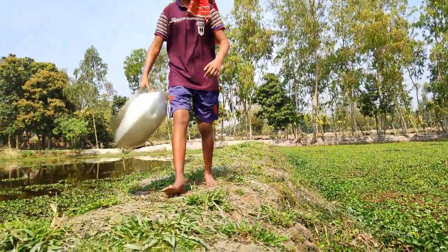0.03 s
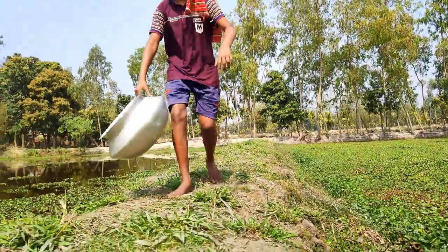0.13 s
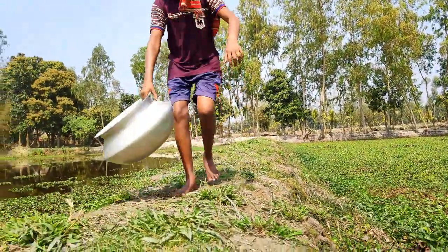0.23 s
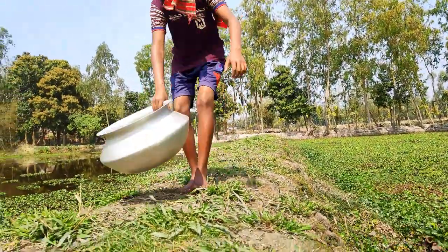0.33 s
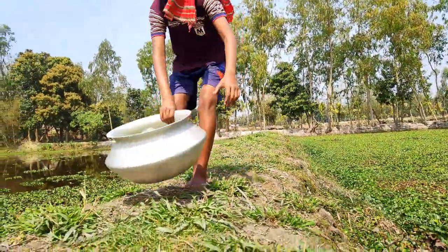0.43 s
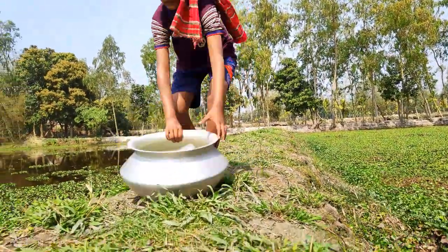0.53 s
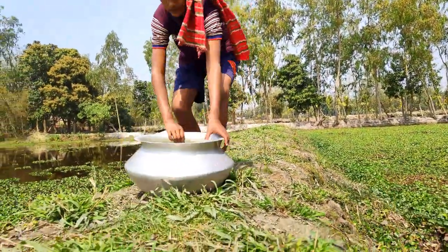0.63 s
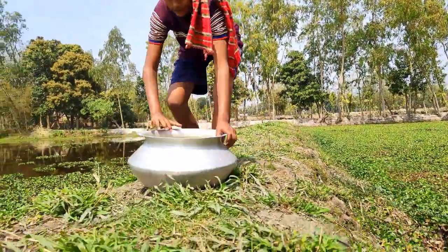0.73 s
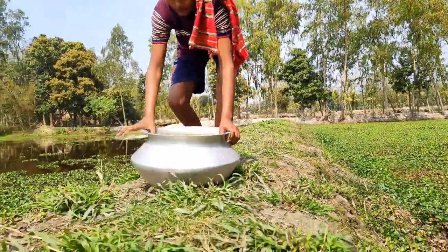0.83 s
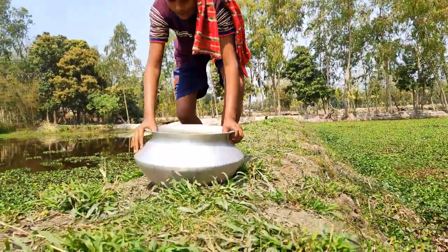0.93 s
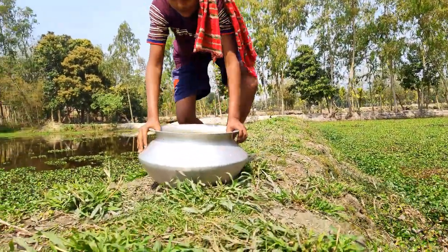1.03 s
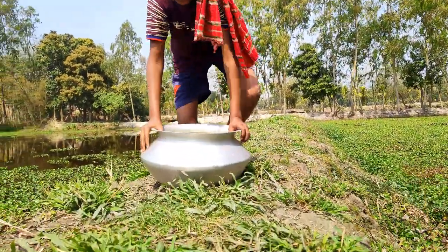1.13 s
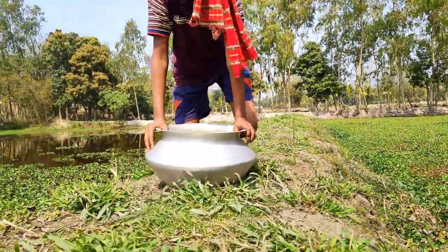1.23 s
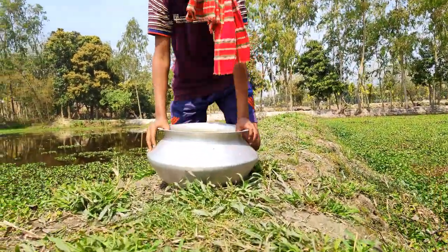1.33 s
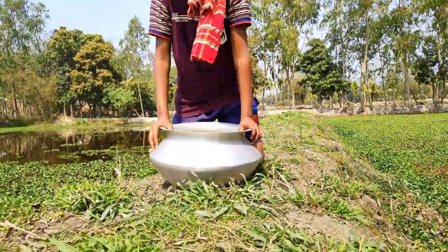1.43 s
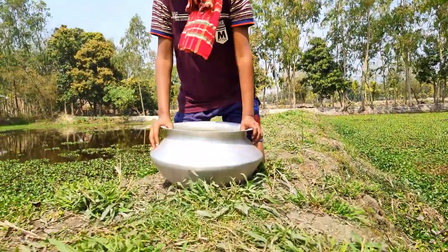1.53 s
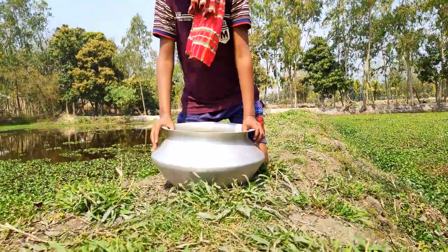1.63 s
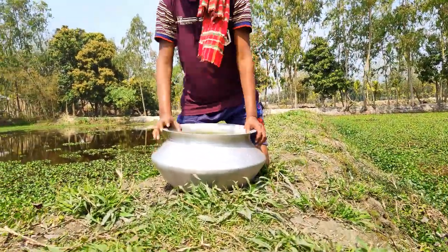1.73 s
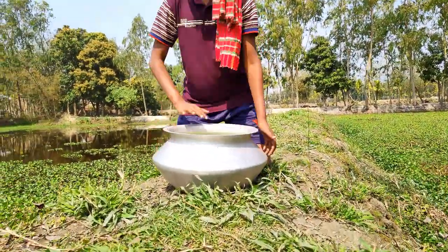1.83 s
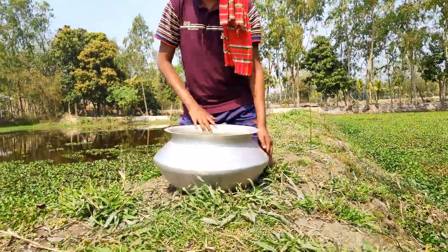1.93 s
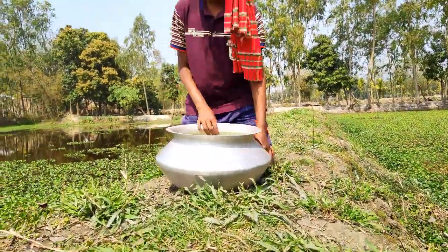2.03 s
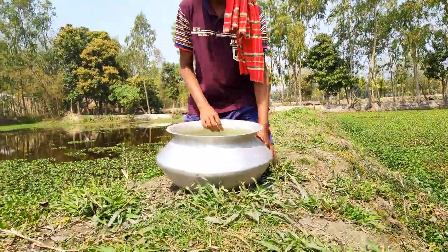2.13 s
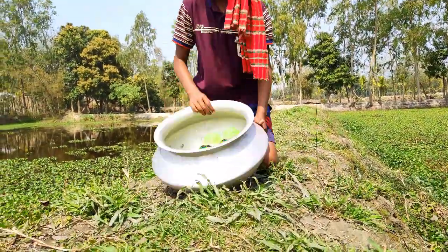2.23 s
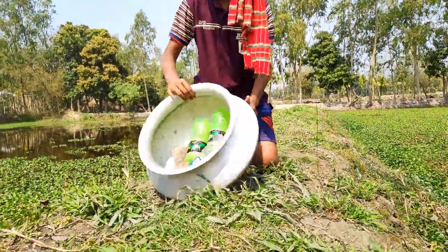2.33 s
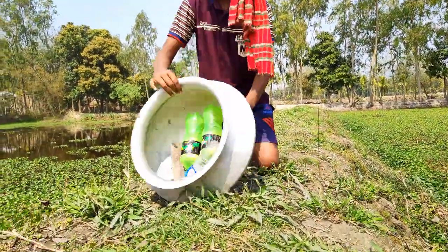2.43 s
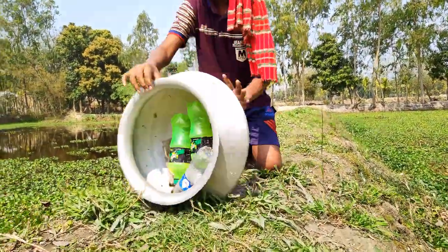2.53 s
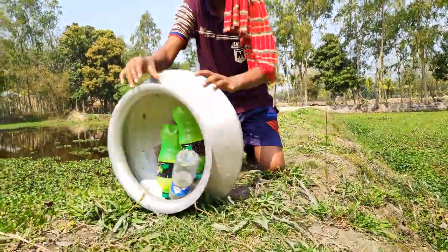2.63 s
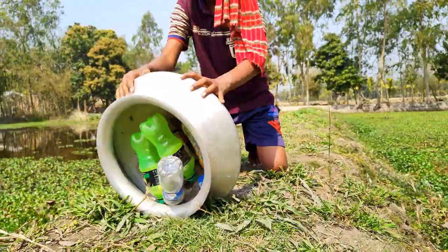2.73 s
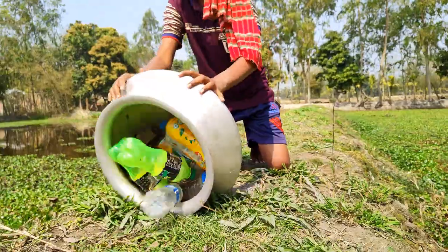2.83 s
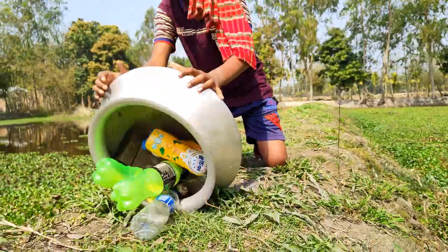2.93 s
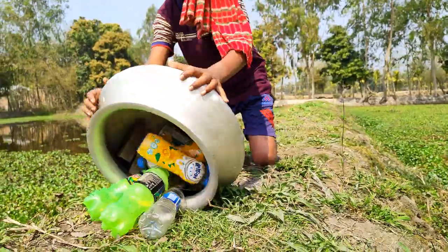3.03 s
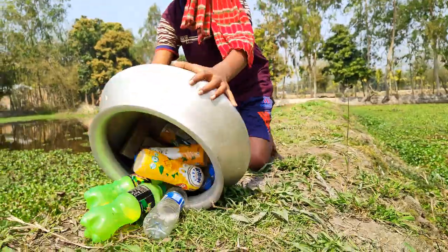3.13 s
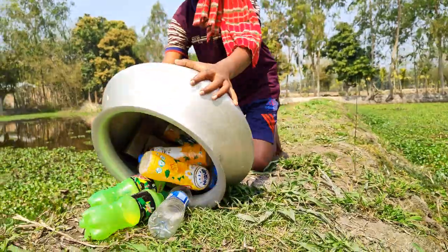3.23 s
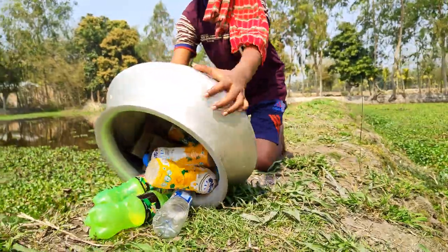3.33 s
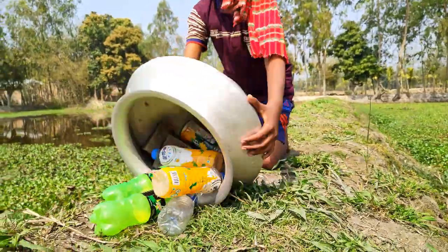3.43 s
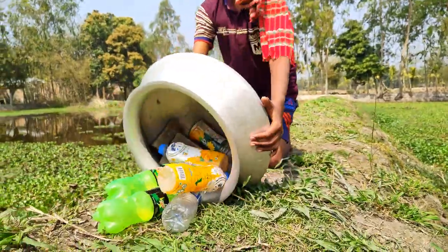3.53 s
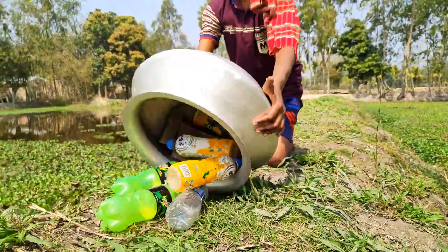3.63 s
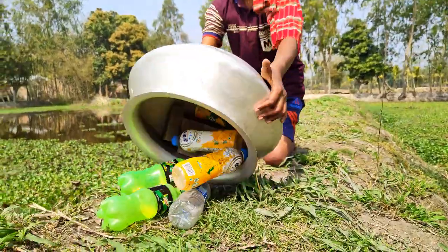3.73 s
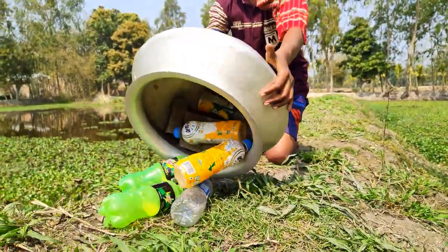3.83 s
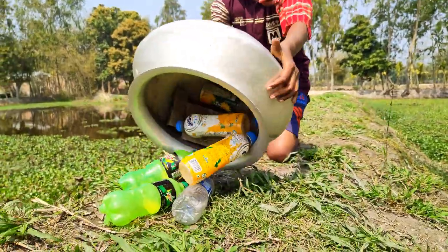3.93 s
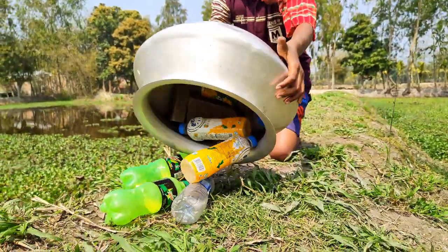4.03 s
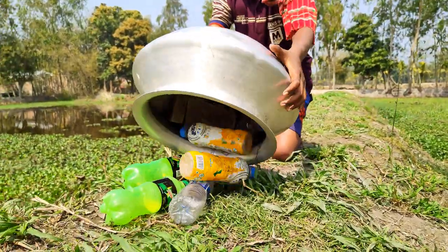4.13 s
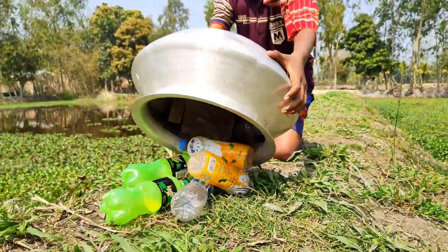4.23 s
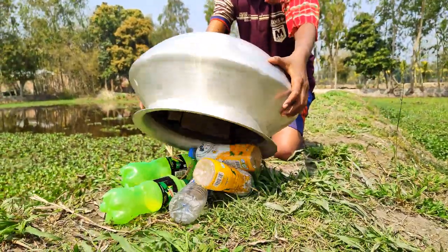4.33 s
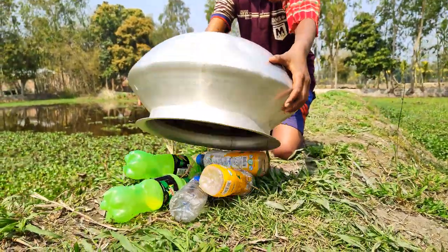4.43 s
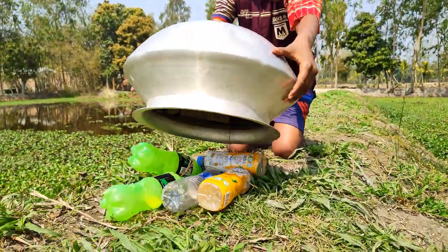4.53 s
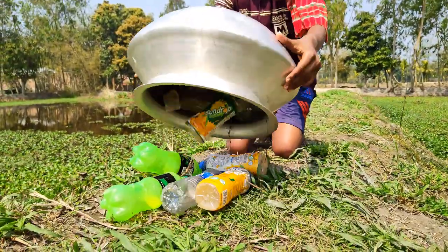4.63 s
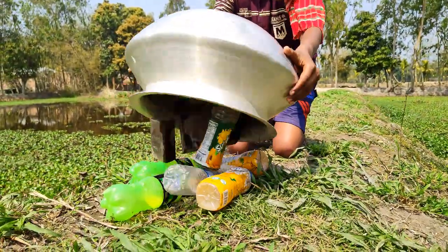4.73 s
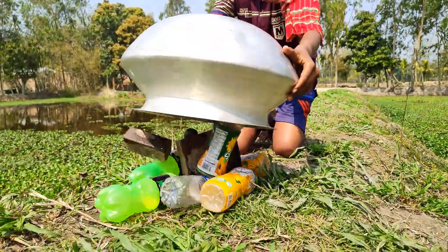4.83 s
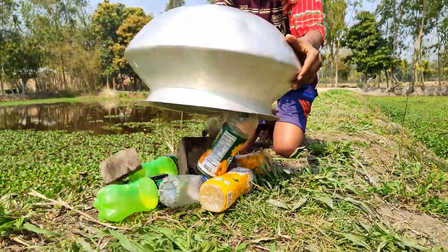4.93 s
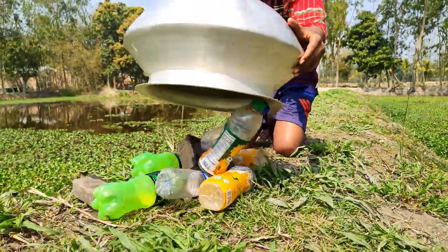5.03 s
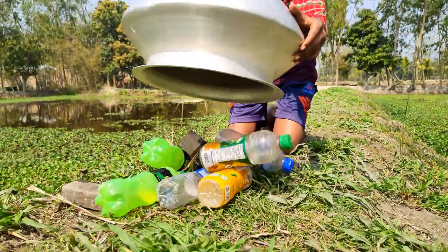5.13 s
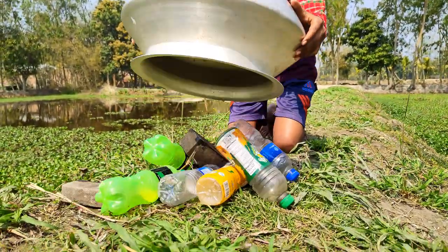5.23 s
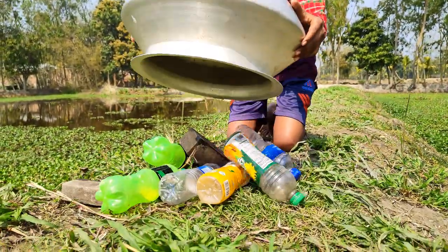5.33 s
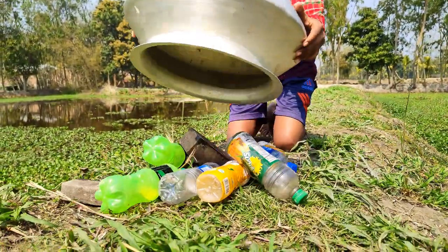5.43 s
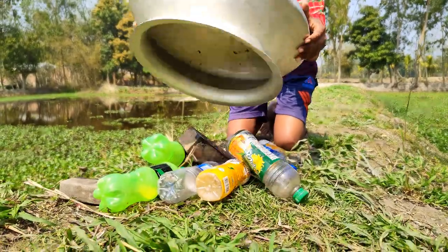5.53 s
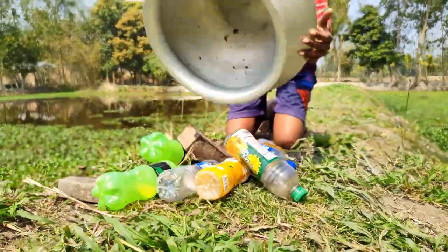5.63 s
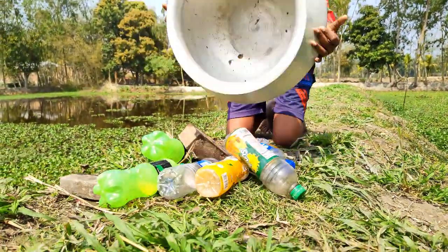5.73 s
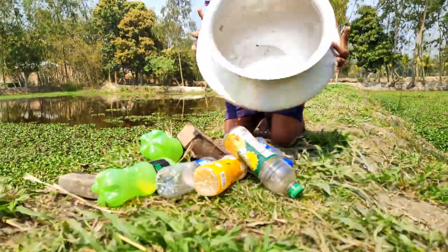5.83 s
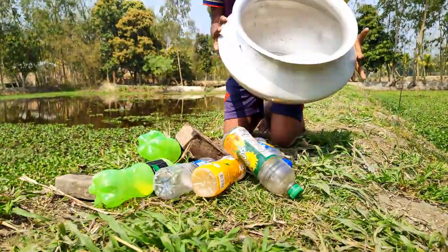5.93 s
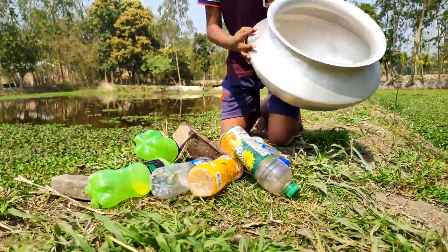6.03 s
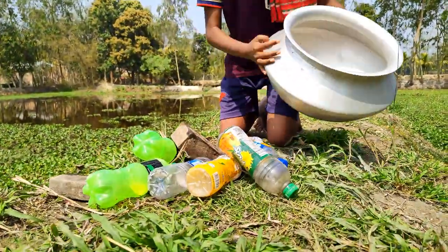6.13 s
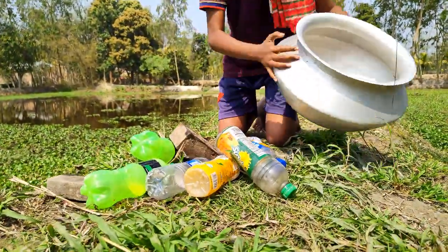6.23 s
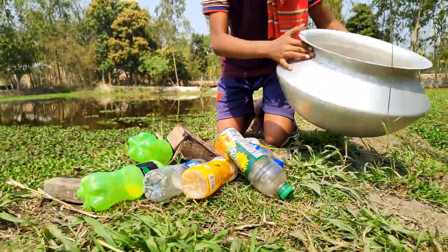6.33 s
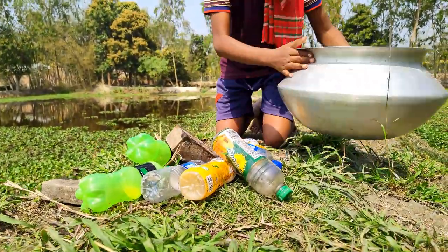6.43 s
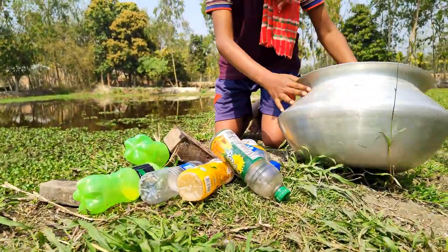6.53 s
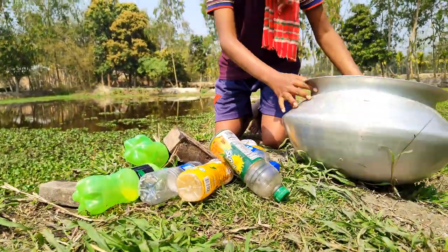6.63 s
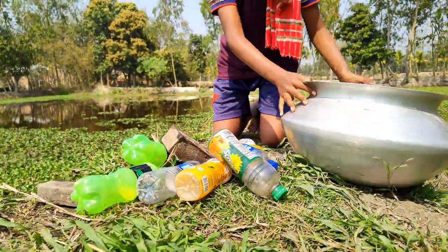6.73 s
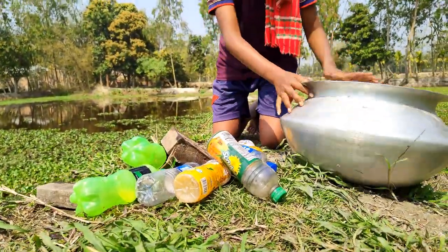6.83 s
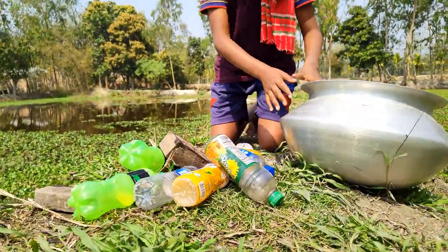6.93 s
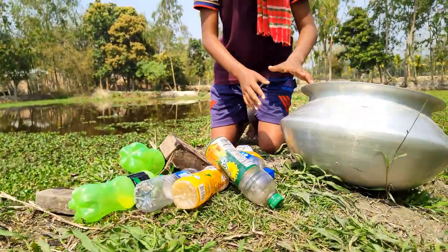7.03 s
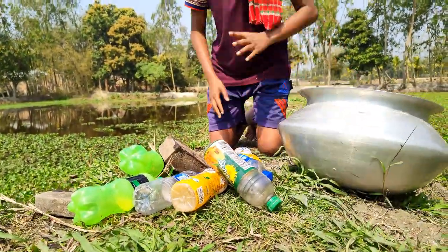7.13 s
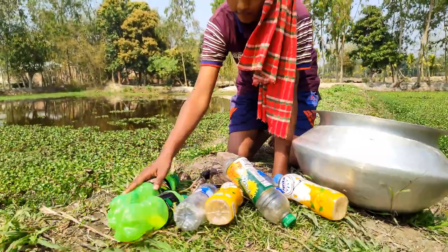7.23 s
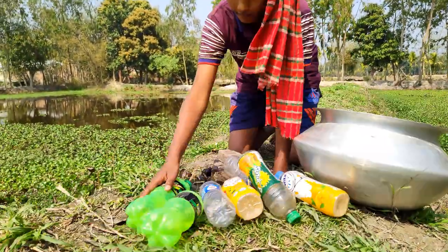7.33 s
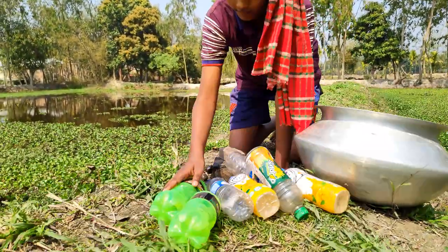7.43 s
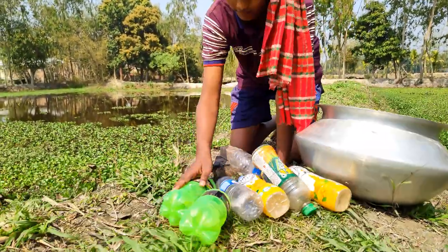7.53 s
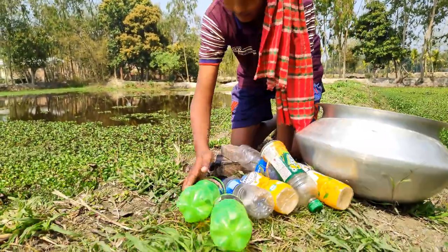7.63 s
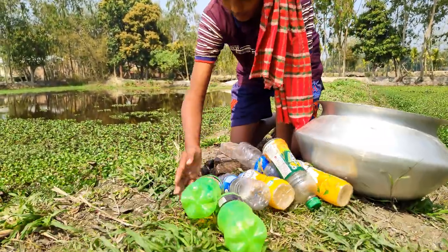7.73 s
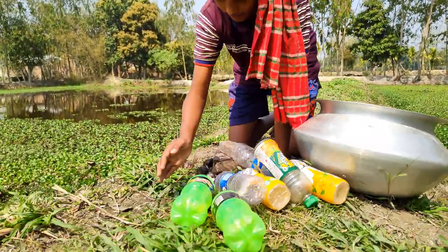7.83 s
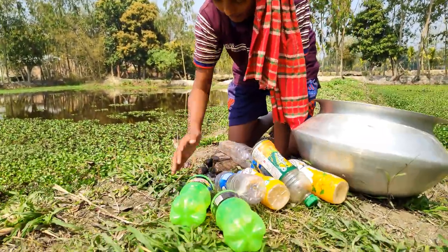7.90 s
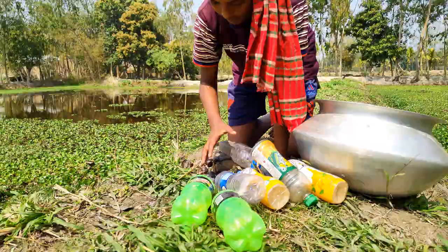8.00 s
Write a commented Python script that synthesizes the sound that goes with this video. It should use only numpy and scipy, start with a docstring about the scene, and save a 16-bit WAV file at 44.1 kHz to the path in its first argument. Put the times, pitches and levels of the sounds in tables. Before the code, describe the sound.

In quiet open land with faint birds and insects, a thin metal pot is put down on grass, plastic bottles jostling inside. After a near-silent pause it is tilted and shaken, releasing crackly plastic snaps, hollow bonks, short metal rings and a hard lump's clink. Rustling cloth, a deep hollow thud as the empty pot lands, low wind buffeting, then small bottle taps and scrapes, heard close and dry in stereo.

```python
"""Bottles in a metal pot

Empty plastic bottles rattle in a large metal pot, which is set down, tipped and shaken out onto grass.
Bottles, pot and a hard lump ring as dying sines; snaps and dull thumps are short bursts of coloured noise.
Grass, cloth, tumbling, wind and open land are shaped noise that follows level tables; birds are gliding tones.
All of it reaches the left and right ports of a microphone, partly alike and slightly apart in time.
"""
import sys
import numpy as np
from scipy import signal
from scipy.fft import rfft, irfft
from scipy.io import wavfile
from scipy.ndimage import uniform_filter1d

SR = 44100
rng = np.random.default_rng(int(sys.argv[2]) if len(sys.argv) > 2 else 0)


def put_to_file(sound):
    """Save the sound as 16-bit audio at rate SR, in the file named by the first command-line argument."""
    columns = np.atleast_2d(sound).T  # one column per channel
    safe = np.clip(columns, -1, 1)
    whole_steps = np.round(safe * 32767)
    wavfile.write(sys.argv[1], SR, whole_steps.astype(np.int16))


N = 355710  # length in samples

LAG_S, LAG_SPREAD_S = 0.00023432, .00009  # the right port hears later
BASS_LAG_SHARE = 0.5  # long waves bend round the microphone's body and arrive closer together


def gain_of(db):
    """Turn decibels into a plain multiplier."""
    return np.exp(np.asarray(db) * (np.log(10) / 20))


def evened(x):
    """Bring x to an average (RMS) strength of 1."""
    return x / np.sqrt(np.mean(x ** 2) + 1e-20)


def read(points, hz):
    """Read a tone colour in dB at any pitch; outside its points it is -90 dB."""
    f, value = np.transpose(points)
    return np.interp(np.log(hz + 1), np.log(f + 1), value, -90, -90)


def curve(table, t, index):
    """Follow one column of a table over time, in straight lines."""
    return np.interp(t, *np.transpose(table)[[0, index]])


def above(hz, edge_hz):
    """A soft step from 0 below the edge to 1 above it."""
    return 1 / (1 + (edge_hz / (hz + 1)) ** 4)


def add(mix, s, sound):
    """Lay a sound into the mix from s seconds on; what passes the end is cut."""
    part = mix[:, round(s * SR):][:, :sound.shape[1]]
    part += sound[:, :part.shape[1]]


# how alike the two ports hear: f/Hz, likeness (0 to 1)
LIKENESS = [(60, 1), (500, 0.96), (1000, 0.87), (1500, 0.6), (3000, 0.088), (15000, 0.66)]


def at_ports(z, hz, lag_s):
    """Two random spectra become left and right: partly alike, the right one late."""
    same = np.clip(np.interp(hz, *np.transpose(LIKENESS)), 0, 1)
    lag_s = lag_s * np.interp(hz, [1200, 2600], [BASS_LAG_SHARE, 1])
    left = same * z[0] + np.sqrt(1 - same ** 2) * z[1]
    right = z[0] * np.exp(-2j * np.pi * hz * lag_s)
    return np.array([left, right])


def noise(shape_db, size, patchy_db, flicker_db, apart=False):
    """Random short-time spectra with drifting patches and a flicker shared by all pitches."""
    hop = size // 4
    frames, hz = N // hop + 5, np.fft.rfftfreq(size, 1 / SR)[:, None]
    a, b, patches = rng.standard_normal((frames, len(hz), 3, 2)).transpose(2, 3, 1, 0)
    patches = uniform_filter1d(patches[0], size=5, axis=0)
    patches = evened(uniform_filter1d(patches, size=20, axis=1))
    flicker = evened(uniform_filter1d(rng.standard_normal(frames), size=3))
    z = a + 1j * b
    if not apart:
        z = at_ports(z, hz, LAG_S)
    level_db = shape_db(hz, np.arange(frames) * hop / SR)
    z *= gain_of(level_db + patchy_db * patches + flicker_db * flicker)
    return signal.istft(z, nperseg=size, noverlap=size - hop)[1][:, :N]


def swells(rows):
    """The summed gain of smooth swells given as (middle s, length s, dB)."""
    t = np.arange(N) / SR
    return sum(gain_of(db) * np.cos(np.pi * np.clip((t - s) / length, -.5, .5)) ** 2
               for s, length, db, *_ in rows)


def crackle(level_db, quiet_db, per_s, spread_db, fade_s, rise_s):
    """The gain for level_db with random jumps that fade away; gentle movement, near quiet_db, stays smooth."""
    heights = gain_of(spread_db * np.minimum(rng.exponential(1, N), 4))
    jumps = (rng.random(N) < per_s / SR) * heights
    for _ in range(2):
        jumps = uniform_filter1d(jumps, round(rise_s * SR) + 1)
    fading = signal.lfilter([1], [1, -np.exp(-1 / (fade_s * SR))], jumps)
    brisk = np.clip((level_db - quiet_db) / 15, 0, 1)
    return gain_of(level_db) * (1 + brisk * fading)


def wavering(x, share, size):
    """x with its level shaken smoothly at random."""
    shake = uniform_filter1d(uniform_filter1d(rng.standard_normal(x.shape[1]), size), size)
    return x * (1 + share * np.tanh(evened(shake)))


def ring(modes, rise_s, length_s, scatter=1):
    """Dying sines at both ports; scatter 0 starts them in step, as one sharp blow does, 1 at random."""
    lag_s = BASS_LAG_SHARE * (LAG_S + LAG_SPREAD_S * rng.standard_normal())
    lag = max(round(lag_s * SR), 0)
    t = np.arange(0, length_s, 1 / SR)
    phases = 2 * np.pi * scatter * rng.random(len(modes))
    tones = sum(gain_of(db - 60 * t / t60) * np.sin(2 * np.pi * hz * t + phase)
                for (hz, db, t60), phase in zip(modes, phases))
    tones *= (1 - np.exp(-t / rise_s)) * np.cos(np.pi / 2 * t / length_s)
    return np.array([tones, np.pad(tones, (lag, 0))[:len(t)]])


def burst(colour, db, hz, t60, treble_db=0, pan_db=0):
    """Noise as a dense cluster of wall modes, brightest near hz: a tick and a body; only the lows keep a tail."""
    size = 5120
    f, t = np.fft.rfftfreq(size, 1 / SR), np.arange(size) / SR
    a, b, lumps = rng.standard_normal((3, 2, len(f)))
    z = at_ports(a + 1j * b, f, LAG_S + LAG_SPREAD_S * rng.standard_normal())
    distance = np.log((f + 1) / hz)
    bump_db = 7 * np.exp(-(distance / 0.085) ** 2) + 4.5 * np.exp(-(distance / 0.51) ** 2)
    bump_db += 2.3 * evened(uniform_filter1d(lumps[0], size=20))
    bump_db += 3.8 * evened(uniform_filter1d(lumps[1], size=6))  # single modes stand out
    z *= gain_of(read(colour, f) + bump_db)
    high = above(f, 4010)
    scale = gain_of(db - 9.5) / np.std(irfft(z))

    tick = gain_of(-4.5 - 60 * t / 0.0029)
    body_t60 = max(t60, .008)
    tail = gain_of(-8.0 - 60 * t / (4.5 * body_t60))
    body = irfft(z * (1 - high)) * (tick + gain_of(-60 * t / body_t60) + tail)
    top_fade = gain_of(-60 * t / max(1.25 * t60, .005))
    top = irfft(z * high) * gain_of(treble_db) * (tick + top_fade)
    edges = (1 - np.exp(-t / 0.00045)) * np.cos(np.pi / 2 * t / t[-1])
    return scale * (body + top) * edges * gain_of([[pan_db / 2], [-pan_db / 2]])


# colour of far birds, insects and leaves, over a low murmur of the land: f/Hz, level/dB (per Hz)
FIELD_COLOUR = [(35, -12), (60, 3.5), (217, 2), (527, -26), (980, -34.5), (1400, -23), (2180, -21),
                (2430, -2.5), (3550, -10), (3960, -11.5), (7050, -25.5), (8420, -50.5), (9400, -24.5),
                (12000, -71.5), (15600, -99), (22000, -120)]
FIELD_DB = -59.5


def field():
    """The steady, patchy sound of the open land, as shaped noise."""
    hum = noise(lambda hz, s: read(FIELD_COLOUR, hz), size=1024, patchy_db=1.0, flicker_db=3.5)
    return gain_of(FIELD_DB) * evened(hum)


# colour of moving air at a port: f/Hz, level/dB (per Hz)
GUST_COLOUR = [(12, -33), (20, -1.5), (50, 0), (120, -7.5), (210, -14), (312, -53), (367, -21),
               (461, -31.5), (500, -76), (650, -64.5), (1100, -120)]
# puffs of wind catch the right port: t/s (middle), length/s, level/dB
PUFFS = [(.31, 0.0948, -60), (4.13, 0.12, -55.5), (4.94, 0.481, -56), (5.33, 0.16, -54), (5.58, 0.21, -50),
         (5.81, 0.15, -45.5), (6.02, 0.39, -51.5), (6.14, 0.14, -45.5), (6.3, 0.23, -45.5),
         (6.48, 0.54, -44), (6.79, 0.38, -35.5), (6.87, 0.18, -50), (7.05, 0.28, -39), (7.2, 0.25, -48)]
BREEZE_DB = -69  # faint, without swells, at both ports
LEE_DB = -18.5  # what the sheltered left port gets of a puff


def wind():
    """Lumpy low pressure, unrelated at the two ports."""
    gust = evened(noise(lambda hz, s: read(GUST_COLOUR, hz), size=1024, patchy_db=1.5, flicker_db=3, apart=True))
    return gust * (gain_of(BREEZE_DB) + gain_of([[LEE_DB], [0]]) * swells(PUFFS))


GLIDE_LATENESS = 5.1  # a call holds its pitch and bends at the end


def call(row, partials):
    """A tone that glides, swells and fades, its partials (multiple, dB); distance and leaves make it flutter."""
    s, length, first_hz, last_hz, db, rough = row
    u = np.arange(0, length, 1 / SR) / length  # 0 to 1 through the call
    turns = np.cumsum(first_hz + (last_hz - first_hz) * u ** GLIDE_LATENESS) / SR
    tone = sum(gain_of(d) * np.sin(2 * np.pi * (k * turns - rng.random((2, 1)) / 4)) for k, d in partials)
    flutter = 1 - rough + rough * evened(uniform_filter1d(rng.standard_normal(len(u)), size=250))
    return s, np.sqrt(2) * gain_of(db) * tone * flutter * np.sin(np.pi * u ** 1.1)


# far bird calls: t/s (start), length/s, first f/Hz, last f/Hz, level/dB, flutter (0 clear to 1 blurred)
BIRDS = [(.41, .22, 4380, 4050, -53, .5), (0.987, 0.042, 3060, 3080, -54, .3),
         (1.042, 0.055, 3700, 3700, -53, .3), (1.084, 0.077, 3540, 3430, -47.5, 0.51),
         (1.154, 0.069, 3670, 3450, -52, .3), (1.36, 0.067, 2900, 2810, -57, 0.17),
         (1.491, 0.17, 3210, 2720, -54.5, 0.35)]
# two faint, hoarse notes: the same columns, with f/Hz at the second harmonic
HOARSE_NOTES = [(6.221, 0.11, 917, 930, -69.5, 0.17), (6.348, 0.18, 927, 912, -63, 0.3)]


def birds():
    """Bird calls are single gliding tones; the hoarse notes have four harmonics."""
    out = np.zeros((2, N))
    for row in BIRDS:
        add(out, *call(row, [(1, 0.0033)]))
    for row in HOARSE_NOTES:
        add(out, *call(row, [(.5, -8), (1, 0), (3 / 2, -6), (2, -1)]))
    return out


# colour of grass, cloth and sliding plastic, also for rustle(): f/Hz, level/dB (per Hz)
RUSTLE_COLOUR = [(530, -35), (900, -31), (1510, -17), (1640, -21), (1920, 2), (2730, 4.5), (4680, 6.5),
                 (5890, -7), (7060, -3.5), (8150, -20.5), (11300, -15.5), (16000, -47.5)]
# soft swishes of cloth and grass: t/s (middle), length/s, level/dB, treble lift/dB
SWISHES = [(.08, 0.6, -51, -18), (.48, 0.53, -48.5, -11), (5.53, 0.26, -55.5, -5), (5.93, 0.35, -48.5, 5.5),
           (6.22, 0.22, -55, 13.5), (6.43, 0.27, -51.5, 3), (6.66, 0.38, -51, 19), (6.93, 0.11, -50, -1.5),
           (7.13, 0.067, -53.5, -19), (7.28, 0.18, -48, -15)]


def swishes():
    """Smooth hiss that swells and fades with each sweep of cloth or grass."""
    def shape_db(hz, s):
        return read(RUSTLE_COLOUR, hz) + above(hz, 7300) * curve(SWISHES, s, index=3)
    return evened(noise(shape_db, size=512, patchy_db=2.5, flicker_db=0.5)) * swells(SWISHES)


# colour of the scrape: f/Hz, level/dB (per Hz)
SCRAPE_COLOUR = [(290, -47), (500, -12), (711, -27), (808, -4.5), (1620, -6.5), (1940, 3.5), (3000, -14),
                 (3900, -46), (6600, -120)]
# something is pulled through the grass: t/s (middle), length/s, level/dB
DRAG = [(1.7, 0.18, -61), (7.52, .2, -51.5), (7.8, 0.39, -52.5)]


def drag():
    """A short, rough, crackling scrape in the middle range."""
    scrape = evened(noise(lambda hz, s: read(SCRAPE_COLOUR, hz), size=256, patchy_db=2.0, flicker_db=-2.0))
    rough = crackle(np.zeros(N), quiet_db=-15, per_s=70, spread_db=2.5, fade_s=.005, rise_s=.001)
    return scrape * swells(DRAG) * rough


# how briskly things slide and tumble, also for tumble(): t/s, rustle level/dB, tumbling rumble level/dB
MOTION = [(0.0, -59, -76), (0.67, -61, -74), (0.75, -37.5, -57), (0.85, -42.5, -39.5), (0.92, -53.5, -55.5),
          (1.19, -57.5, -57.5), (1.35, -61, -88), (2.04, -54, -71), (2.43, -51.5, -65.5),
          (2.65, -45.5, -43.5), (2.83, -31.5, -34), (2.92, -41, -38), (3.01, -38.5, -31.5),
          (3.3, -67, -52.5), (3.48, -46, -56.5), (3.74, -51.5, -47), (3.8, -50.5, -58), (4.0, -52.5, -64),
          (4.3, -47, -38), (4.6, -55.5, -57.5), (4.83, -37, -38.5), (4.94, -40.5, -34.5),
          (5.32, -60, -48.5), (5.55, -61, -80.5), (7.26, -62, -71), (7.46, -44, -48), (7.64, -49.5, -52.5),
          (7.69, -49.5, -61), (7.8, -47, -64), (8.07, -55.5, -66.5)]


def rustle():
    """Grass and sliding plastic: patchy, crackling hiss that follows the movement."""
    hiss = evened(noise(lambda hz, s: read(RUSTLE_COLOUR, hz), size=256, patchy_db=2.5, flicker_db=0.8))
    level_db = curve(MOTION, np.arange(N) / SR, index=1)
    return hiss * crackle(level_db, quiet_db=-52.5, per_s=100, spread_db=2.1, fade_s=0.0043, rise_s=.0007)


# dull colour of many small knocks, also for the thump in knocks(): f/Hz, level/dB (per Hz)
RUMBLE_COLOUR = [(53, -51.5), (90, -46), (232, -2.5), (300, 8.5), (529, -14), (652, 4), (737, -13),
                 (823, -2.5), (1080, -3.5), (1270, -14), (1700, -2.5), (2210, -37), (3740, -120)]


def tumble():
    """Countless small knocks blur into a lumpy rumble."""
    rumble = evened(noise(lambda hz, s: read(RUMBLE_COLOUR, hz), size=512, patchy_db=3, flicker_db=2.0))
    level_db = curve(MOTION, np.arange(N) / SR, index=2)
    return rumble * crackle(level_db, quiet_db=-59.0, per_s=60, spread_db=2.0, fade_s=0.0048, rise_s=0.0026)


# a hard lump, perhaps brick, clinks: t/s, level/dB
CLINKS = [(3.8983, -29.5), (3.9453, -42)]
# the lump's modes: f/Hz, level/dB (added to the clink's), t60/s (time to fall 60 dB)
LUMP = [(1560, -6, 0.13), (1870, -11, 0.13), (2476, 7.5, 0.067), (3030, 3, 0.08754), (3235, -7.5, 0.0866),
        (4560, -6, 0.2168)]


def clinks():
    """Short, clear rings; each blow favours other modes."""
    out = np.zeros((2, N))
    for s, db in CLINKS:
        modes = [(f, db + d + 2.0 * rng.standard_normal(), t60) for f, d, t60 in LUMP]
        add(out, s, ring(modes, .0006, 0.0982))
    return out


# the pot's bottom meets the ground: t/s, level/dB (before a 10 dB lift), f/Hz, t60/s
THUDS = [(0.686, -34.5, 74, 0.044), (0.6917, -9, 284, 0.017), (6.6929, 0, 242, 0.028),
         (6.705, -15, 283, 0.035), (6.7235, -15, 250, 0.035), (7.044, -41, 193, 0.047)]


def thuds():
    """The air in the pot is pushed once and its swing dies quickly."""
    out, t = np.zeros((2, N)), np.arange(0, .2, 1 / SR)
    for s, db, hz, t60 in THUDS:
        swing = (1 - np.exp(-(t / 0.0035) ** 2)) * gain_of(db + 10.0 - 60 * t / t60)
        add(out, s + 0.00083, np.tile(-swing * np.sin(2 * np.pi * hz * t), (2, 1)))
    return out


# colour of a snap: f/Hz, level/dB (per Hz)
SNAP_COLOUR = [(410, -27.5), (700, -34), (946, -9), (1380, -17), (1890, -2.5), (2270, -6), (3550, -3),
               (5690, -11.5), (6920, -13), (8210, -23), (13000, -30.5), (16000, -49.5)]
# a thin wall or cap snaps: t/s, level/dB, brightest f/Hz, t60/s (base value), treble over the usual colour/dB
CRACKS = [(0.547, -31, 2870, 0.019, 11.5), (0.6938, -23.5, 4290, 0.12, 10), (0.7292, -18.5, 3440, 0.14, 1),
          (0.77, -19.5, 3350, 0.054, -5.5), (0.79, -7, 3420, 0.043, -2), (.797, -8.5, 3260, 0.065, -4.5),
          (0.831, -19, 3400, .042, 4), (0.861, -23, 4230, 0.044, 2), (.871, -22.5, 3250, 0.043, -4),
          (1.0348, -31, 3600, 0.067, 0), (1.18, -35, 3650, 0.055, -18.5), (1.852, -39, 3300, 0.12, -14),
          (1.868, -36.5, 3250, 0.42, -10), (1.911, -34.5, 3757, 0.54, 3), (1.96, -37, 3500, 0.2243, 11.5),
          (2.0709, -20, 1455, 0.046, -2), (2.114, -35.5, 4030, 0.4, -3), (2.4871, -14, 3490, 0.095, -8),
          (2.554, -18.5, 3660, 0.19, -6), (2.6618, -19.5, 2220, 0.17, 4), (2.662, -15, 4580, 0.097, -1),
          (2.6894, -11, 3260, 0.091, -19.5), (2.7455, -11, 3520, 0.037, -5),
          (2.768, -4.5, 2000, 0.014, -28), (2.784, -10, 1890, 0.082, -9), (2.785, -9.5, 3270, 0.049, -4),
          (2.813, -6.5, 3600, 0.047, 1), (2.819, -8, 1940, 0.098, -2), (2.824, -10, 2640, 0.081, -5),
          (2.846, -13, 4200, 0.054, -7), (2.899, -14.5, 2020, 0.08, -15), (2.901, -14.5, 2690, 0.088, -16),
          (2.9444, -17, 3340, 0.19, -13), (2.9818, -14, 3800, 0.2, -4), (3.002, -16, 2950, .04, -6),
          (2.9894, -14, 1890, 0.045, -8), (3.011, -11.5, 3030, 0.061, 1), (3.012, -17.5, 1760, 0.07, -10),
          (3.026, -12, 1790, 0.047, 0), (3.0815, -21, 1905, 0.085, -3), (3.1199, -11.5, 1945, 0.041, -10),
          (3.1208, -10.5, 3270, 0.068, 7), (3.1664, -25.5, 2980, 0.19, 3), (3.228, -34.5, 3550, 0.2768, 14),
          (3.289, -32, 1270, 0.23, -3), (3.466, -21, 3180, 0.036, -22), (3.708, -30, 3230, 0.49, 1.5),
          (3.837, -35, 1660, 0.051, -10), (3.866, -21, 2510, 0.043, -2), (3.8986, -20.5, 2510, 0.047, 2.5),
          (3.9445, -33, 3000, 0.098, 17), (4.1076, -32, 2760, 0.084, 6.5), (4.1467, 1.5, 2020, 0.038, -15),
          (4.2877, -20, 2300, 0.027, -13.5), (4.289, -25, 2320, 0.32, -26.5), (4.31, -33, 2280, .05, -13.5),
          (4.368, -29, 2990, 0.03, 19), (4.381, -32, 4530, 0.034, 14), (4.404, -26.5, 3530, 0.041, 2.5),
          (4.41, -17.5, 3160, 0.037, 1.5), (4.48, -42, 2000, 0.036, -7), (4.502, -33, 3430, 0.026, -4),
          (4.5147, -39, 5200, 0.084, 19), (4.595, -19.5, 2194, 0.052, -2), (4.678, -30.5, 3340, .08, -18.5),
          (4.6953, -20, 3480, 0.089, -14), (4.732, -22, 3360, 1, -19.5), (4.79, -1, 3400, 0.026, -2.5),
          (4.796, -7.5, 2686, 0.087, 2), (4.8309, -9.5, 3463, 0.054, 2), (4.8639, -11, 3230, 0.46, -21),
          (4.9002, -11.5, 2590, 0.089, 6), (4.9442, -13, 3380, 0.091, 5), (5.0056, -10.5, 4820, 0.025, 5.5),
          (5.053, -7, 1960, 0.019, -9.5), (5.054, -14, 3170, 0.17, -21), (5.068, -19, 4530, 0.025, 6),
          (5.1542, -27.5, 1420, 0.043, -2), (5.22, -20, 1850, 0.018, -1), (5.192, -35, 2000, 0.024, 12),
          (5.264, -37, 3280, .025, 8), (5.2764, -25.5, 1900, 0.027, -13), (5.284, -28, 1920, 0.035, -16.5),
          (5.3366, -34, 3340, 0.033, 10), (5.383, -28.5, 1740, 0.022, 0.5),
          (6.6944, -27.5, 2430, 0.14, 7.5), (7.059, -63, 5300, 0.067, 30.5), (7.296, -36, 3000, 1, 6.5),
          (7.31, -34, 2930, 0.028, -2), (7.4095, -16, 3000, 0.014, 1), (7.41, -18.5, 1750, 0.014, -15),
          (7.444, -16.5, 2860, 0.019, -3), (7.445, -24, 1900, .02, -15), (7.4642, -19.5, 1840, 0.022, 4),
          (7.49, -33, 3200, 0.022, -5), (7.548, -35, 1480, .04, 2), (7.589, -35.5, 1740, 0.057, -4),
          (7.64, -33, 4100, .04, 3), (7.748, -38, 1920, .04, -10), (7.776, -37, 2000, 0.046, -10),
          (7.817, -39, 1950, .04, -10), (8.002, -37, 2650, .03, -4)]
CRACK_PAN_DB = 2.5  # the heap lies a little to the left (L-R)
SNAP_RING_DB, SNAP_RING_SHARE = -10.5, 1.2  # the ring's level against the snap, and its share of t60


def cracks():
    """Each snap is a burst plus a short, close pair of tones at its brightest pitch and just above."""
    out = np.zeros((2, N))
    for s, db, hz, t60, treble_db in CRACKS:
        add(out, s, burst(SNAP_COLOUR, db, hz, t60, treble_db, pan_db=CRACK_PAN_DB))
        pair_t60 = min(SNAP_RING_SHARE * max(t60, .01), .15)
        pair = [(hz * ratio, db + SNAP_RING_DB + d, pair_t60) for ratio, d in [(1, -1), (1.045, -6)]]
        add(out, s, ring(pair, 0.0016, .1))
    return out


# a bottle's modes: pitch ratio, level/dB (added to the knock's), share of t60
BOTTLE = [(0.999, -2, 0.52), (1.06, -16, 0.73), (1.5, -15.5, 0.37), (2.1, -19.5, 0.43), (0.68, -18, 0.29),
          (0.802, -15, 0.79)]
# a bottle's body and air struck: t/s, level/dB, f/Hz, t60/s (base value)
KNOCKS = [(0.547, -36, 196, 0.026), (0.694, -20.5, 300, 0.23), (.704, -24.5, 656, 0.066),
          (0.712, -19.5, 445.5, 0.32), (.72, -21, 700, 0.066), (0.729, -15.5, 459, 0.18),
          (.737, -21, 880, 0.094), (0.743, -25, 441, 0.15), (.751, -16.5, 793, 0.078),
          (0.759, -12.5, 310, 0.046), (.768, -18.5, 753, 0.12), (0.775, -15, 358, 0.073),
          (0.792, -12.5, 660, 0.14), (0.831, -36, 265, 0.26), (.845, -33, 330, 0.05745),
          (0.875, -25.5, 307, 0.11), (.879, -28, 700, 0.099), (.898, -30.5, 645, .08),
          (0.932, -24, 310, 0.063), (.948, -32.5, 328, 0.21), (.952, -35, 820, 0.071),
          (0.986, -30, 310, 0.08), (0.997, -30, 295, 0.14), (1.015, -24, 310, 0.067),
          (1.069, -43, 288, 0.17), (1.114, -33, 890, 0.026), (1.122, -37, 890, .04),
          (1.151, -35, 295.5, 0.37), (1.18, -39.5, 967, 0.17), (1.195, -40, 305, 0.062),
          (1.205, -40, 630, 0.1), (1.38, -42.5, 1000, 0.069), (1.711, -42, 970, 0.05),
          (1.912, -40, 279, 0.054), (2.069, -24.5, 638, 0.097), (2.07, -27, 202, 0.063),
          (2.093, -33, 294, 0.1), (2.195, -55, 820, 0.069), (2.203, -44.5, 221, 0.28),
          (2.212, -56, 650, 0.33), (2.4885, -14.5, 627, 0.22), (2.49, -17.5, 355, 0.087),
          (2.556, -19, 637, 0.19), (2.593, -20, 371, 0.22), (2.648, -28.5, 273, 0.34),
          (2.689, -25, 340, 0.15), (2.766, -14.5, 620, 0.1), (2.767, -18.5, 1025, 0.099),
          (2.768, -20, 330, 0.11), (2.82, -14, 354, 0.068), (2.871, -15, 220, 0.078),
          (2.915, -22.5, 457, 0.14), (2.945, -23, 650, 0.4), (2.961, -17, 250, 0.13),
          (2.983, -18, 263, 0.076), (3.001, -24.5, 258, 0.12), (3.029, -21, 266.6, 0.074),
          (3.062, -28, 800, .07), (3.082, -26, 910, 0.074), (3.119, -16, 415, 0.077),
          (3.121, -10.5, 864, 0.06), (3.163, -23, 861, 0.15), (3.2, -29.5, 1040, 0.066),
          (3.255, -24, 1046, 0.1), (3.289, -27, 237.3, 0.39), (3.463, -24.5, 799, .09),
          (3.472, -27, 256, 0.1), (3.53, -40, 640, .12), (3.535, -36.5, 285, 0.15), (3.608, -33, 300, .08),
          (3.62, -26, 624, 0.077), (3.626, -29, 246, 0.12), (3.634, -31, 790, .07),
          (3.637, -32, 1110, 0.065), (3.68, -40, 524, .06), (3.735, -42, 580, .06),
          (3.863, -11, 952, 0.086), (4.055, -31, 934, 0.21), (4.078, -32, 893, 0.3),
          (4.146, -6, 334, 0.025), (4.188, -23, 273, 0.16), (4.286, -31, 332, .05),
          (4.33, -22.5, 253, 0.08), (4.355, -26, 248, .04), (4.368, -27.5, 923, 0.18),
          (4.502, -21.5, 989, 0.093), (4.526, -22.5, 988, 0.14), (4.582, -28, 930, 0.16),
          (4.5947, -9.5, 1001, 0.091), (4.652, -44, 1020, 0.18), (4.679, -20, 266, 0.42),
          (4.681, -31, 750, .1), (4.717, -34, 230, 0.52), (4.77, -17.5, 267, 0.15), (4.828, -27, 238, 0.64),
          (4.846, -18, 390, 0.069), (4.867, -17.5, 940, 0.14), (4.899, -17.5, 275, 0.12),
          (4.95, -18.5, 991, 0.074), (5.002, -28.5, 416, 0.068), (5.034, -21.5, 380, 0.078),
          (5.054, -13.5, 837, 0.09), (5.071, -20, 1000, 0.12), (5.093, -27.5, 380, 0.05),
          (5.105, -15.5, 980, 0.095), (5.153, -23, 395, 0.13), (5.155, -26.5, 602, 0.13),
          (5.185, -24.5, 302, 0.17), (5.211, -30, 900, 0.051), (5.22, -18.5, 1010, 0.06815),
          (5.277, -19, 980, 0.039), (5.284, -22, 975, 0.057), (5.323, -27, 476, 0.12),
          (5.409, -29, 940, 0.037), (5.473, -30.5, 1040, 0.11), (5.59, -25, 495, 0.062),
          (5.591, -30.5, 760, 0.054), (5.77, -52.5, 626, 0.063), (6.649, -37, 620, 0.073),
          (7.269, -50, 371.2, 0.067), (7.294, -28, 1050, 0.083), (7.302, -22.5, 1005, 0.082),
          (7.31, -20.5, 1160, 0.078), (7.337, -28, 338, 0.041), (7.444, -36, 680, 0.05),
          (7.447, -30, 1060, 0.072), (7.465, -29.5, 1100, .06), (7.477, -32, 609, 0.088),
          (7.51, -42, 405, .1), (7.508, -34.5, 630, 0.12), (7.548, -30.5, 376, 0.055),
          (7.55, -37, 780, .06), (7.586, -34.5, 370, 0.06904), (7.588, -34, 1080, .06),
          (7.637, -42, 483, 0.16), (7.736, -45, 1120, 0.07), (7.758, -40, 1100, 0.082),
          (7.773, -38, 845, 0.077), (7.785, -48.5, 402, 0.35), (7.822, -50.5, 910, 0.059),
          (7.855, -49.5, 407, 0.15), (8.004, -43, 1110, 0.081)]
THUMP_DB, THUMP_DB_PER_OCTAVE = -5.5, -3  # the thump under a 300 Hz knock; higher knocks ring cleaner


def knocks():
    """Each knock rings the bottle's modes at its own pitch over a dull, dense thump."""
    out = np.zeros((2, N))
    for s, db, hz, t60 in KNOCKS:
        modes = [(hz * ratio, db + d, max(t60, .01) * share) for ratio, d, share in BOTTLE]
        add(out, s, ring(modes, 0.0012, 0.23, scatter=0.29))
        thump_db = db + THUMP_DB + THUMP_DB_PER_OCTAVE * np.log2(hz / 300)
        add(out, s, burst(RUMBLE_COLOUR, thump_db, hz, t60))
    return out


# the pot's modes, its two main low ones first: f/Hz, level/dB (added to the blow's), share of the base ring time
POT = [(452.3, 2.5, 0.5), (810, 6.5, 0.46), (700, -24.5, 0.41), (1314, -20, 0.4), (1366, -20.5, 0.31),
       (1438, -11.5, 0.67), (1550, -13, 0.77), (1655, -19, 0.74), (1930, -15.5, 0.94), (1934, -14, 0.61),
       (1874, -18.5, 0.44), (1970, -17, .6), (2145, -16.5, 0.9), (2250, -22.5, .5), (2420, -11, .45),
       (2510, -11, 0.63), (2940, -20, 0.5), (3220, -16.5, 0.55), (3420, -15.5, .4), (3610, -21, 0.5)]
# the pot is struck: t/s, upper modes level/dB, first mode level/dB, second mode level/dB, most struck f/Hz,
# ring time (multiple of the base)
CLANKS = [(0.6936, -55, -23.5, -43, 2500, 1.54), (0.7902, -43, -42, -43, 2500, 2),
          (1.83, -49, -84, -77, 1400, 1.8), (1.866, -41, -84, -69, 1600, 2),
          (1.9103, -41, -86, -58, 1740, 2.1), (1.979, -47, -82, -62, 1910, 3.3),
          (2.072, -29, -68, -47.5, 1740, 1.36), (2.215, -56, -80, -72, 2100, 0.73),
          (2.489, -36, -54, -55, 2700, 1.6), (2.6617, -23, -42, -65, 1720, 2.2),
          (2.766, -16.5, -33.5, -57, 1920, 1.3), (2.8149, -17.5, -39, -59, 1950, 1.4),
          (2.9, -31, -50, -60, 2400, 1), (2.9576, -23, -40, -42, 1900, 1.2),
          (3.011, -23, -47, -55, 1750, 0.89), (3.121, -28, -30, -46, 2100, 1.54),
          (3.1678, -37, -42, -50, 2200, 2.4), (3.4675, -40, -69, -53, 2200, 1.4),
          (3.63, -41, -68, -70, 1610, 1), (3.696, -34.5, -70, -70, 1900, 1.2),
          (3.9, -33.5, -69, -68, 2200, 1.9), (4.145, -15, -36, -39.5, 1750, 0.98),
          (4.187, -18.5, -60, -40.5, 2320, 0.9), (4.368, -31.5, -64, -52, 2400, 1.4),
          (4.795, -18, -49, -60, 2600, .8), (4.8489, -18.5, -28, -51, 2200, 1.55),
          (4.9001, -17.5, -30.5, -35, 1700, 1.2), (4.9453, -19, -34, -46, 2200, 1.6),
          (5.0521, -15, -41, -36, 2250, 0.98), (5.1044, -32, -62, -39.5, 1650, 2.2),
          (5.318, -51, -45, -51, 1910, 1.7), (5.384, -50, -70, -56, 1800, 1.7),
          (5.473, -49, -66, -57, 1750, 1.3), (6.451, -43.5, -88, -84, 1500, 1.5),
          (6.63, -59, -45.5, -55, 1600, 2.4), (6.648, -43, -31, -37, 1700, 2.23),
          (6.6942, -33.5, -23, -45, 2220, 1.34), (6.724, -42, -39, -61, 1710, 1.8),
          (6.885, -42.5, -80.5, -74, 2130, 1.9), (6.929, -48, -78, -69.5, 1700, 2),
          (7.11, -56, -64, -73, 2300, .8), (7.301, -49, -45, -48, 2200, 1.4)]
POT_T60_S, UPPER_T60_S = 0.44, 0.32  # base ring left by hands and ground: two main modes, upper modes
REACH = 0.49  # how wide a range of modes a blow wakes, as a natural log of the pitch ratio
BEND = 0.0033  # random shift of each mode's pitch, as a share
EMPTY_S, EMPTY_SHIFT = 5.6, (-0.0087, 0.0253)  # once empty, the two main modes shift by these shares
GROUNDED = 0.8  # share of the two main modes' ring left to the empty pot, held and resting on grass
FIRM_DB, RISE_S, RISE_S_PER_DB = -38.5, 0.003, -0.07  # blows below firm start the upper modes sooner
CHATTER, LOW_CHATTER = 0.42, .3  # loose bottles and fingers roughen the upper modes; the main two waver less


def clanks():
    """The place of each blow decides which of the pot's modes ring; what stays on the wall damps it."""
    out = np.zeros((2, N))
    base_t60 = np.r_[POT_T60_S, POT_T60_S, np.full(len(POT) - 2, UPPER_T60_S)]
    upper_hz = np.transpose(POT)[0, 2:]
    for s, upper_db, first_db, second_db, hz, ringing in CLANKS:
        place, bend = rng.standard_normal((2, len(POT)))
        t60 = base_t60 * max(ringing, .2)
        if s > EMPTY_S:
            bend[:2] += np.array(EMPTY_SHIFT) / BEND
            t60[:2] *= GROUNDED
        reach_db = -np.minimum(10 * (np.log(upper_hz / hz) / REACH) ** 2, 30.)
        struck_db = np.r_[first_db, second_db, upper_db + reach_db + 2.5 * place[2:]]
        modes = [(f * (1 + BEND * b), d + e, t * share)
                 for (f, d, share), e, t, b in zip(POT, struck_db, t60, bend)]
        rise_s = max(RISE_S + RISE_S_PER_DB * max(FIRM_DB - upper_db, 0), .0005)
        add(out, s, wavering(ring(modes[2:], rise_s, 0.32), CHATTER, size=140))
        add(out, s, wavering(ring(modes[:2], 0.0058, 0.51), LOW_CHATTER, size=350))
    return out


def scene():
    """Background, movement and blows together."""
    small = tumble() + clinks() + cracks() + knocks() + clanks()
    # too small for deep bass
    small = signal.sosfilt(signal.butter(2, 110., "high", fs=SR, output="sos"), small)
    background = field() + wind() + birds()
    return background + swishes() + drag() + rustle() + thuds() + small


# how the two ports differ in colour: f/Hz, level/dB (L-R)
PORTS = [(60, -5), (110, -0.5), (200, 1), (380, -0.5), (700, 1.5), (1290, -1), (2380, -0.5), (4400, -1),
         (8120, -7), (15000, 4.5)]
FULL_SCALE, EDGE_HZ = .95, 16100  # ceiling for rounded peaks; top of the band


def record(dry):
    """The ports differ in colour, the loudest peaks are rounded off; then the band limit."""
    hz = np.fft.rfftfreq(N, 1 / SR)
    port_hz, port_db = np.transpose(PORTS)
    tilt_db = np.interp(np.log(hz + 1), np.log(port_hz), port_db)
    heard = irfft(rfft(dry) * gain_of(np.array([[.5], [-.5]]) * tilt_db), N)
    heard = heard / (1 + (abs(heard) / FULL_SCALE) ** 4) ** (1 / 4)
    low_pass = signal.firwin(511, EDGE_HZ, window=("kaiser", 9), fs=SR)
    return signal.oaconvolve(heard, low_pass[None], "same")


dry = scene()
out = record(dry)
put_to_file(out)
```